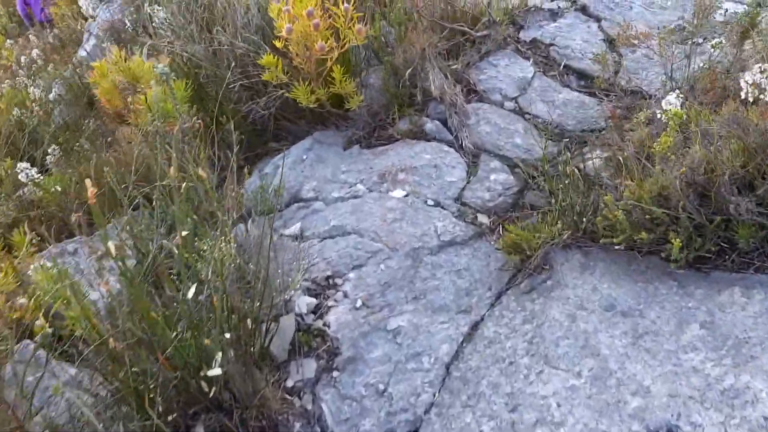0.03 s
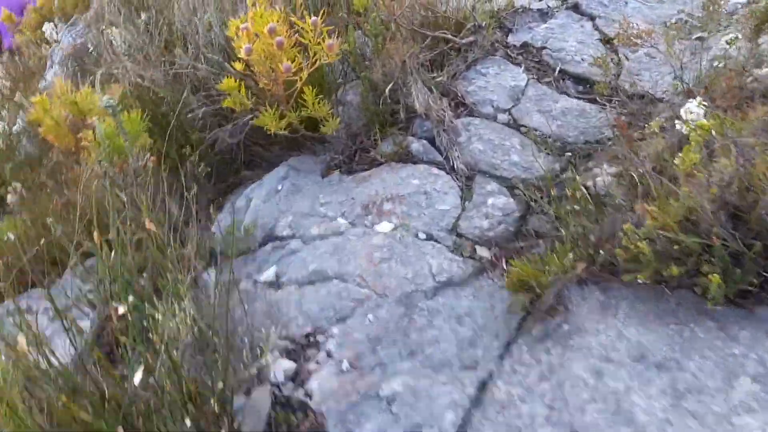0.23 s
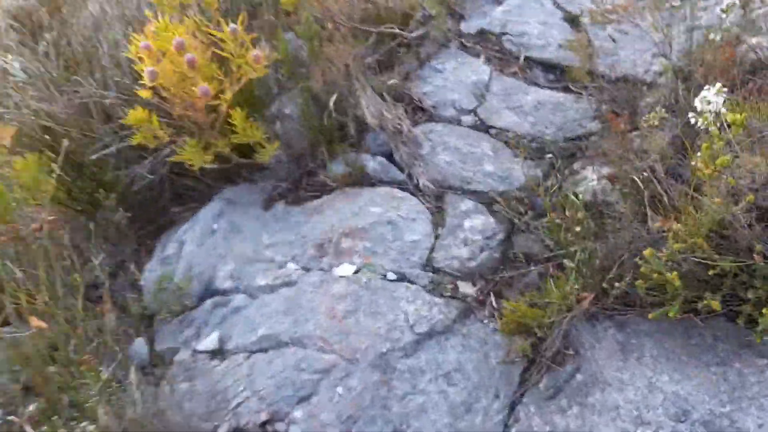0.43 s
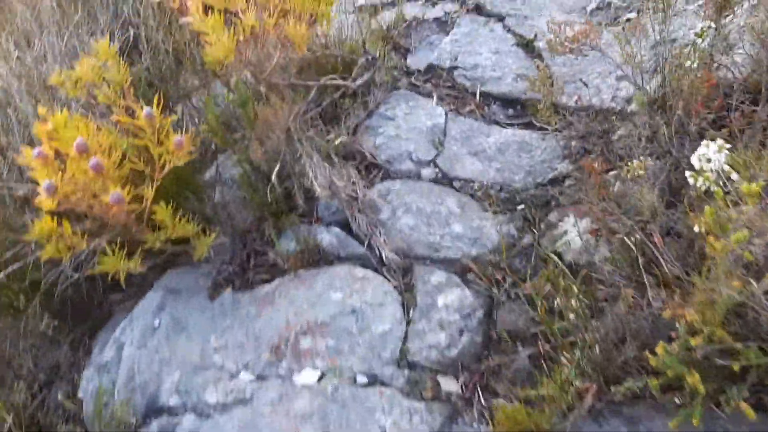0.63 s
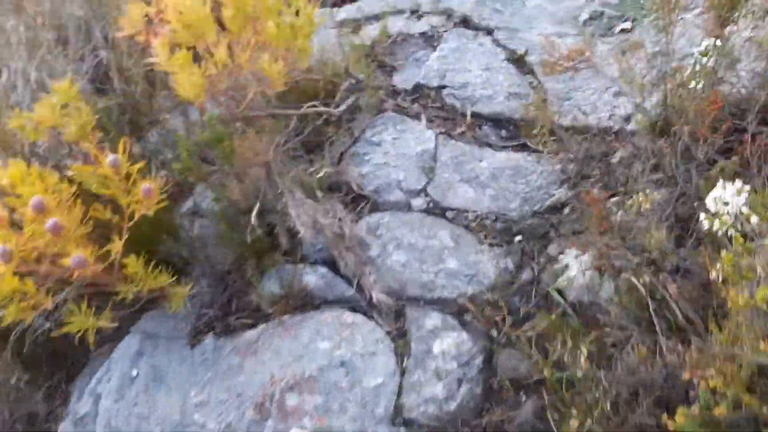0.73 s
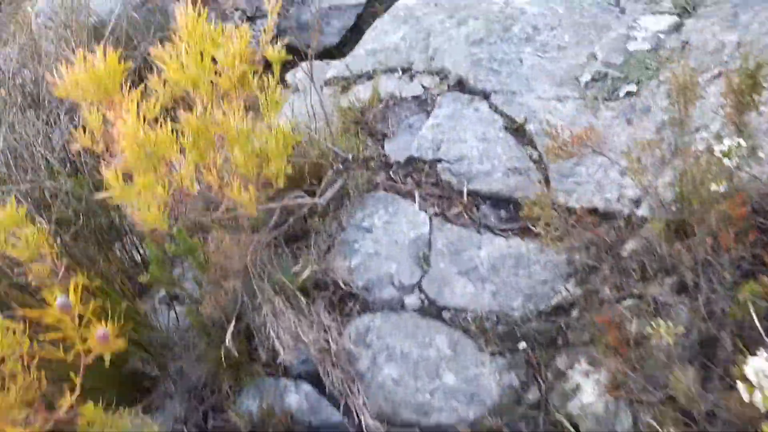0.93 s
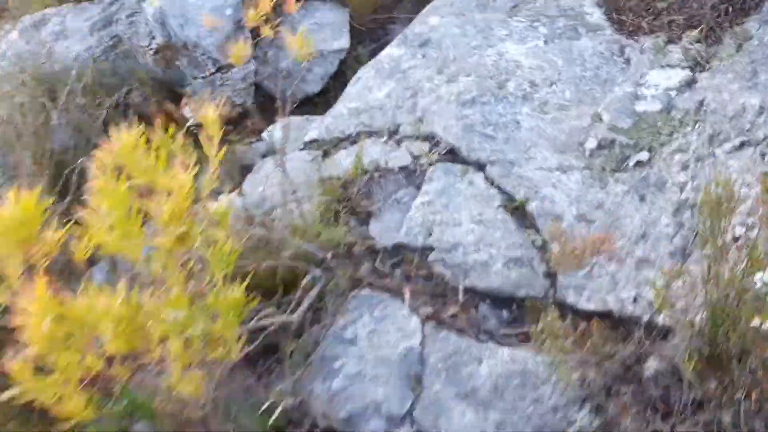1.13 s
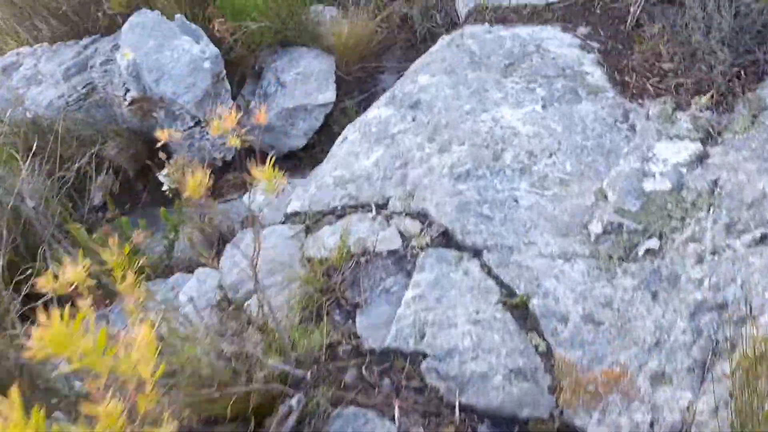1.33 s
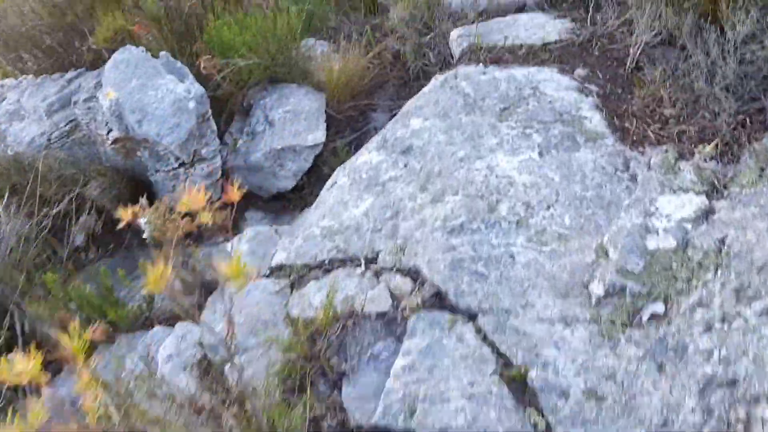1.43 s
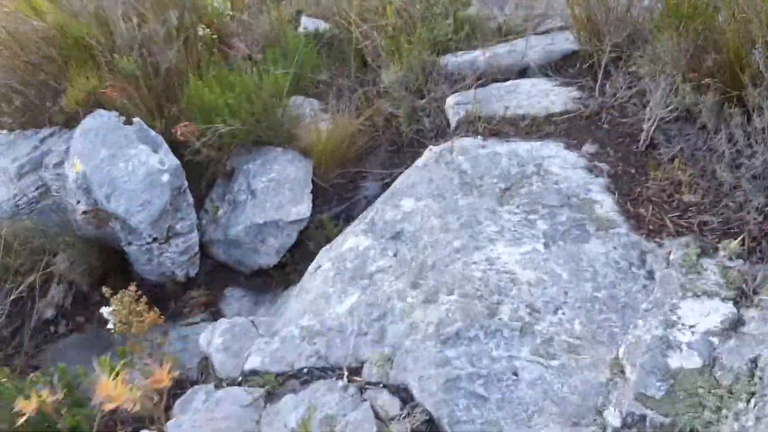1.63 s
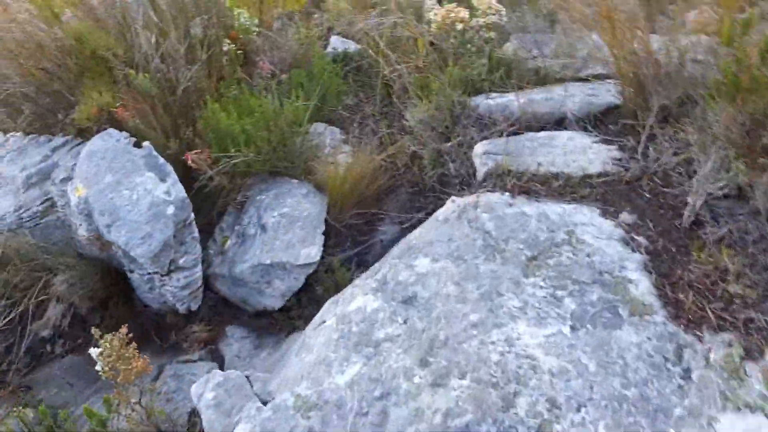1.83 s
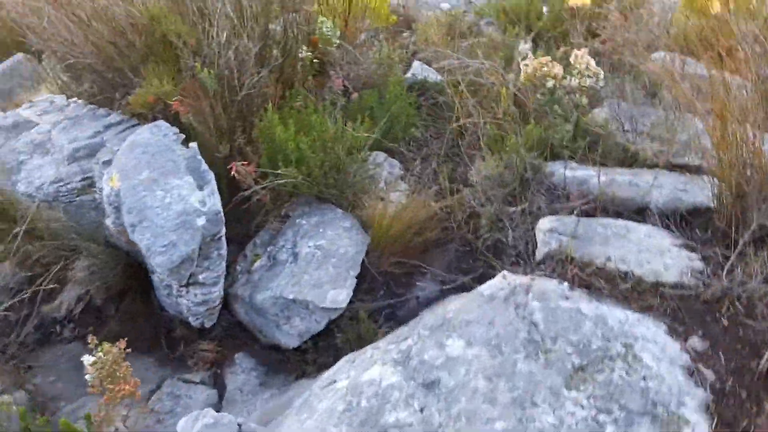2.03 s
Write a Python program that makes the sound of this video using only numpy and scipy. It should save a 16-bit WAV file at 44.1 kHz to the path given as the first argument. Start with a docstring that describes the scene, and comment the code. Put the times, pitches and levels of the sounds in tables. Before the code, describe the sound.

Footsteps on stone slabs, knocking and scraping, with one short gust of wind.

```python
"""A hiker on sandstone slabs, an open hillside, heard close on a hand-held stereo microphone.
Faint air hisses. A quarter second in, a gust buffets the microphone ports as a boot knocks, thumps
and scuffs on the rock. Around the half second something hard clacks and rings against stone, twigs
and grit tick, and scrub swishes past. More knocks and scuffs follow to the end, with weak puffs of wind."""
import sys
import numpy as np
from scipy import signal
from scipy.fft import rfft, irfft, next_fast_len
from scipy.io import wavfile
from scipy.ndimage import uniform_filter1d

SR = 44100
rng = np.random.default_rng(int(sys.argv[2]) if len(sys.argv) > 2 else 0)


def store_wav(level_fs):
    """Save 16-bit WAV to argv[1]."""
    pcm = np.round(np.clip(np.atleast_2d(level_fs), -1, 1) * 32767)
    wavfile.write(sys.argv[1], SR, pcm.T.astype(np.int16))


N = 92610
T = np.arange(N) / SR
AGE = T[:SR // 3]  # seconds into one short event


def undb(db):
    """Decibels to gain."""
    return 10 ** (np.asarray(db) / 20)


def unit(x):
    """Scale to rms 1."""
    return x / np.sqrt(np.mean(x ** 2))


def fade(age, t60):
    """Exponential decay, 60 dB down after t60 seconds."""
    return np.exp(-np.log(1000) * age / max(t60, 1e-4))


def curve(points):
    """Gain over time from (s, dB) points."""
    return undb(np.interp(T, *np.array(points).T))


def swell(start, rise, t60):
    """Straight rise, exponential fall."""
    return np.clip((T - start) / rise, 0, 1) * fade(np.maximum(T - start - rise, 0), t60)


def flicker(db, per_s):
    """A gain that wanders quickly at random."""
    hold = int(SR / per_s)
    steps = np.repeat(rng.standard_normal(N // hold + 1), hold)
    return undb(db * uniform_filter1d(steps, hold)[:N])


def colour(x, points, tilt_db=0):
    """Minimum-phase filter through (Hz, dB) points, tilted per octave."""
    size = next_fast_len(2 * x.shape[-1]) // 2 * 2
    octave = np.log2(np.maximum(np.fft.rfftfreq(size, 1 / SR), 1))
    hz, db = np.array(points).T
    gain = undb(np.interp(octave, np.log2(hz), db + tilt_db * np.log2(hz / hz[0])))
    cepstrum = irfft(np.log(gain))
    cepstrum[1:size // 2] *= 2
    cepstrum[size // 2 + 1:] = 0
    return irfft(rfft(x, size) * np.exp(rfft(cepstrum)))[..., :x.shape[-1]]


def band(x, hz, spread, order=2):
    """Band-pass from hz / spread to hz * spread, kept under half the sample rate."""
    edges = [hz / spread, min(hz * spread, SR / 2 - 1000)]
    return signal.sosfilt(signal.butter(order, edges, "band", fs=SR, output="sos"), x)


def add(out, x, start):
    """Mix x in at a time in seconds."""
    i = int(start * SR)
    out[:, i:i + x.shape[1]] += x[:, :N - i]


def pan(left_db):
    """Two gains that favour the left port by left_db."""
    return undb(np.array([[left_db], [-left_db]]) / 2)


def underfoot(x, lag_s=0.00013):
    """A source on the ground below the microphone: a little louder and later at the right port."""
    late = np.pad(x, (round(lag_s * SR), 0))[:len(x)]
    return np.array([x, late]) * pan(-2.4)


def ground_noise(size, diffuse=0.38):
    """Stereo noise from underfoot, part of its power arriving from all around."""
    direct = underfoot(rng.standard_normal(size))
    return np.sqrt(1 - diffuse) * direct + np.sqrt(diffuse) * rng.standard_normal((2, size))


def port_noise(correlation):
    """Noise at the two microphone ports with a given correlation."""
    mid, side = rng.standard_normal((2, N))
    return np.sqrt(1 + correlation) * mid + np.sqrt(1 - correlation) * side * np.array([[1], [-1]])


def grains(per_s=3000, spread_db=3):
    """Dense tiny clicks of uneven size."""
    clicks = ground_noise(N) * (rng.random(N) < per_s / SR)
    return clicks * undb(spread_db * np.minimum(rng.exponential(size=N), 4))


# Tone of the open hillside. Each row: frequency in Hz, relative level in dB.
AIR_SPECTRUM = [(30, 2.5), (150, -7.5), (330, 4), (600, -4.5), (1000, -12), (1600, -10), (2500, -14),
                (5000, -13.5), (7500, -13.5), (10000, -20), (15500, -15)]
# Its slow drift. Each row: time in seconds, level in dB.
AIR_LEVELS = [(0, -54.5), (.8, -52), (1.12, -53.5), (1.2, -56), (1.45, -50.5), (1.68, -53.5), (1.79, -57.5),
              (1.95, -53)]


def hillside_air():
    """Open air hisses faintly all around the microphone, flickering slightly."""
    hiss = unit(colour(port_noise(correlation=0.16), AIR_SPECTRUM))
    return hiss * curve(AIR_LEVELS) * flicker(db=0.9, per_s=25)


# Rumble right on the microphone. Each row: frequency in Hz, relative level in dB.
WIND_SPECTRUM = [(22, -47), (48, -2.5), (75, 0), (130, -5.5), (250, -15), (500, -23), (1500, -43)]
# One gust, then weak puffs. Each row: time in seconds, level in dB.
WIND_LEVELS = [(0, -49.5), (.06, -50.5), (.11, -53.5), (.22, -45.5), (.255, -30), (.32, -32.5),
               (.39, -34.5), (.42, -30.5), (.455, -54.5), (.52, -61), (1.17, -59), (1.26, -43.5),
               (1.33, -55.5), (1.44, -44.5), (1.49, -65.5), (1.65, -48.5), (1.79, -78), (1.99, -49),
               (2.1, -69)]


def wind_on_ports():
    """Eddies push on the two ports, mostly in opposition."""
    return unit(colour(port_noise(correlation=-0.45), WIND_SPECTRUM)) * curve(WIND_LEVELS)


# Tone of scrub and clothing. Each row: frequency in Hz, relative level in dB.
SWISH_SPECTRUM = [(120, -4.5), (380, 3.5), (800, 0.5), (1500, 5.5), (2200, -8.5), (3500, 1.5), (7000, -7),
                  (10000, -9.5), (15000, -12)]
# Scrub passing close by. Each row: start, rise and 60 dB fall in seconds, level in dB,
# tilt in dB per octave.
SCRUB_SWISHES = [(.25, 0.1, 0.44, -50, 3.5), (0.543, 0.0096, 0.86, -41.5, -2), (.60, 0.029, 0.12, -44.5, 8)]


def scrub_swishes():
    """Scrub and clothing brush past: a soft rustle with a fine crackle in it."""
    out = np.zeros((2, N))
    for start, rise, t60, db, tilt_db in SCRUB_SWISHES:
        rustle = ground_noise(N) + 1.5 * unit(grains())
        out += undb(db) * swell(start, rise, t60) * unit(colour(rustle, SWISH_SPECTRUM, tilt_db))
    return out


# Scuffs on the slabs below. Each row: start, rise and 60 dB fall in seconds, level in dB,
# band centre in Hz, band edges as a ratio to the centre.
SOLE_SCUFFS = [(0.298, 0.015, 0.12, -43.5, 1350, 1.71), (.380, 0.015, 0.096, -42.5, 3400, 1.52),
               (0.712, 0.022, 0.039, -48, 890, 1.68), (0.787, 0.024, 0.34, -50, 4670, 1.34),
               (1.236, 0.018, 0.035, -45.5, 1810, 2.25), (1.381, 0.068, 0.13, -48.5, 380, 1.72),
               (1.40, 0.051, 0.14, -55.5, 2020, 1.6), (1.589, 0.029, 0.25, -55, 1700, 1.38),
               (1.871, 0.034, 0.079, -47.5, 1380, 1.27)]


def sole_scuffs():
    """The sole drags over sand grains and dry scrub, grabbing and slipping unevenly."""
    out = np.zeros((2, N))
    for start, rise, t60, db, hz, spread in SOLE_SCUFFS:
        drag = grains() * flicker(db=4.5, per_s=260)
        out += undb(db) * swell(start, rise, t60) * unit(band(drag, hz, spread, order=3))
    return out


# Thin ticks underfoot. Each row: start in seconds, level in dB, 60 dB decay in seconds.
TWIG_TICKS = [(0.4534, -29, 0.0053), (.4805, -33.5, 0.024), (.4885, -45, .015), (0.5035, -28.5, 0.045),
              (0.514, -32.5, 0.033), (0.7345, -38.5, 0.024)]


def twig_ticks():
    """Twigs snap and grit is pinched: tiny, very bright bursts."""
    out = np.zeros((2, N))
    for start, db, t60 in TWIG_TICKS:
        snap = unit(band(ground_noise(len(AGE)), hz=14540, spread=1.58))
        add(out, undb(db) * snap * fade(AGE, t60), start)
    return out


# Modes that a clack rings. Each row: frequency in Hz, relative level in dB, 60 dB decay in seconds.
CLACK_MODES = [(1767, -2, 0.052), (2040, 0, 0.06), (4900, 4, 0.05)]


def clack_ring(age, partials=4, detune=0.025):
    """Every mode is a cluster of close partials that beat against each other."""
    ring = np.zeros_like(age)
    for hz, db, t60 in CLACK_MODES:
        for _ in range(partials):
            partial_hz = hz * (1 + detune * rng.uniform(-0.89, 1))
            ring += undb(db) * fade(age, t60) * np.sin(2 * np.pi * (partial_hz * age + rng.random()))
    return ring * (age > 0) / np.sqrt(partials)


# Tone of hard contact on stone. Each row: frequency in Hz, relative level in dB.
CLACK_SPECTRUM = [(150, -22), (500, -0.5), (1300, 0.5), (2000, 3.5), (2900, 0), (3800, -1.5), (4700, 7.5),
                  (7500, -5), (16000, -10.5)]
# Clacks close below the microphone. Each row: peak time in seconds, level in dB,
# 60 dB decay in seconds, tilt in dB per octave.
STONE_CLACKS = [(0.4426, -37, 0.033, -1), (0.474, -40, 0.023, 2), (0.5022, -26, 0.037, 2.5),
                (0.515, -37.5, 0.075, 0), (.5560, -26, 0.033, 0), (0.5592, -30, 0.025, 0.5),
                (0.566, -16, 0.0063, 0), (.5690, -29.5, 0.052, 0), (.6165, -35.5, 0.0085, 5)]


def stone_clacks(lead_s=0.01, bite_t60=0.0034, ring_db=-23):
    """Something hard hits stone: a quick bite up to a crack, and the same modes ringing on."""
    out = np.zeros((2, N))
    after, before = np.maximum(AGE - lead_s, 0), np.maximum(lead_s - AGE, 0)
    for peak, db, t60, tilt_db in STONE_CLACKS:
        contact = unit(colour(ground_noise(len(AGE)), CLACK_SPECTRUM, tilt_db))
        crack = contact * fade(after, t60) * fade(before, bite_t60)
        ring = undb(ring_db) * underfoot(clack_ring(after))
        add(out, undb(db) * (crack + ring), peak - lead_s)
    return out


# Weight landing on the slab. Each row: time in seconds, level in dB, pitch in Hz,
# 60 dB decay in seconds, shift to the left of the underfoot position in dB.
BOOT_THUMPS = [(.2450, -29.5, 190, 0.035, 6), (.2883, -14.5, 240, 0.01, 5), (0.2950, -23.5, 134, 0.022, 3),
               (0.4, -26, 126, 0.014, 9)]


def boot_thumps(roll_cycles=0.28):
    """Soft, deep thuds that swell and die as the weight rolls onto the sole."""
    out = np.zeros((2, N))
    for time, db, hz, t60, left_db in BOOT_THUMPS:
        age = T - time
        # an exponential rise rounds over into an exponential fall
        push = np.exp(-np.logaddexp(-age * hz / roll_cycles, np.log(1000) * age / t60))
        thud = np.cos(2 * np.pi * hz * age) * push / push.max()
        out += undb(db) * underfoot(thud) * pan(left_db)
    return out


def blow(hz, t60, attack_share=0.063):
    """A heavily damped swing of peak 1; the softer the contact, the slower it builds."""
    build = 1 - np.exp(-AGE / (attack_share * t60))
    swing = np.sin(2 * np.pi * hz * AGE) * build * fade(AGE, t60)
    return swing / np.abs(swing).max()


# Body of boot and slab, shared by all knocks. Each row: frequency in Hz, gain in dB.
KNOCK_BODY = [(70, -16), (280, 1), (1550, -6), (1900, -12.5), (4400, -2), (8000, 0)]
# Dull knocks of boot on rock, right below the microphone. Each row: start in seconds, level in dB
# ahead of the body filter, pitch in Hz, 60 dB decay in seconds, grit in dB relative to the blow.
BOOT_KNOCKS = [(0.2319, -18.5, 717, 0.012, -8), (0.3028, -27.5, 446, 0.02, -11),
               (0.3151, -29, 1340, 0.0048, -19), (0.384, -28, 530, 0.0078, -8),
               (0.4212, -31.5, 1370, 0.007, -21), (0.4514, -32, 865, 0.01, -11),
               (0.5119, -22.5, 930, 0.012, -11), (0.5424, -29, 407, 0.0047, 1),
               (0.5568, -28, 970, 0.0083, -8), (0.9377, -40, 573, 0.01, -7), (1.0689, -24, 960, 0.004, -15),
               (1.0720, -31, 860, 0.0052, -6), (1.0843, -34.5, 1270, 0.009, -13),
               (1.234, -37.5, 1000, 0.0057, -6), (1.2540, -34.5, 716, 0.0049, -8),
               (1.5084, -26.5, 1170, 0.0047, -9), (1.5183, -25.5, 557, 0.0031, -4.5),
               (1.5208, -23, 1220, 0.0026, -10), (1.526, -25, 1450, 0.0072, -35),
               (1.5282, -13, 1440, 0.0023, -26), (1.603, -38, 292, 0.031, -29),
               (1.678, -35, 790, 0.0028, -7), (1.8912, -33.5, 990, 0.0022, -29),
               (1.9181, -21.5, 810, 0.0026, -24), (1.9703, -35, 1100, 0.0044, -15)]


def boot_knocks(scatter_db=-11.5, scatter_t60=0.041, grit_t60=0.034):
    """Each blow of the boot is followed by a short scatter off the rocks and a spit of grit."""
    out = np.zeros((2, N))
    for start, db, hz, t60, grit_db in BOOT_KNOCKS:
        scatter = unit(band(ground_noise(len(AGE)), hz, spread=1.93, order=3)) * fade(AGE, scatter_t60)
        grit = unit(band(ground_noise(len(AGE)), hz=2010, spread=1.396)) * fade(AGE, grit_t60)
        knock = undb(scatter_db) * scatter + undb(grit_db) * grit - underfoot(blow(hz, t60))
        add(out, undb(db) * knock, start)
    return colour(out, KNOCK_BODY)


def scene():
    """Everything that reaches the microphone in the hand."""
    impacts = boot_knocks() + boot_thumps() + stone_clacks() + twig_ticks()
    return impacts + sole_scuffs() + scrub_swishes() + wind_on_ports() + hillside_air()


# Response of the hand-held microphone. Each row: frequency in Hz, gain in dB.
MIC_RESPONSE = [(25, -2.5), (55, 2.5), (7700, 0), (8500, -9), (10500, 0), (13000, -1.5)]


def record(dry, top_hz=15900):
    """The microphone has a dip in the treble; the top is cut steeply."""
    top_cut = signal.ellip(10, 0.2, 80, top_hz, fs=SR, output="sos")
    return signal.sosfilt(top_cut, colour(dry, MIC_RESPONSE))


dry = scene()
out = record(dry)
store_wav(out)
```